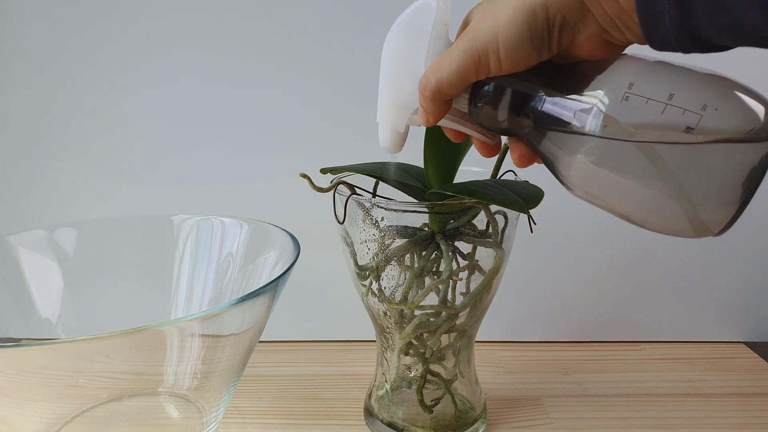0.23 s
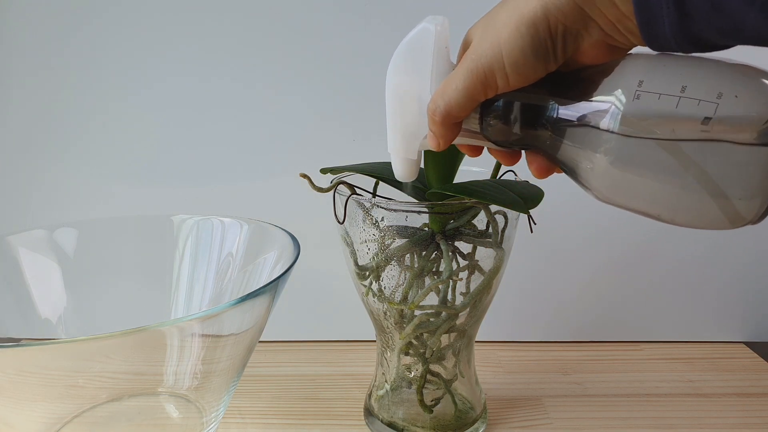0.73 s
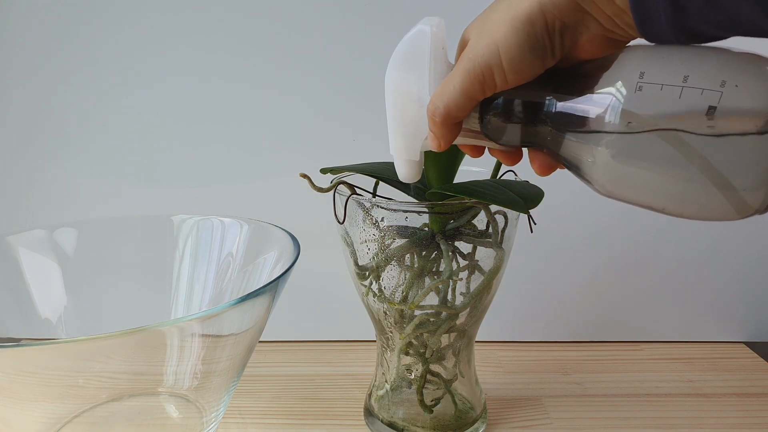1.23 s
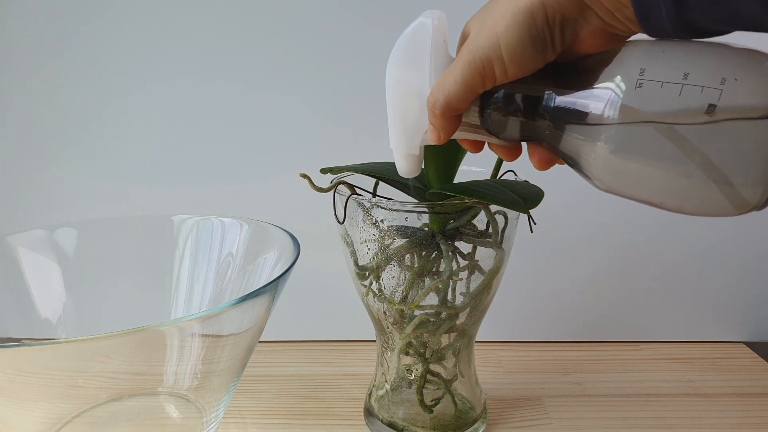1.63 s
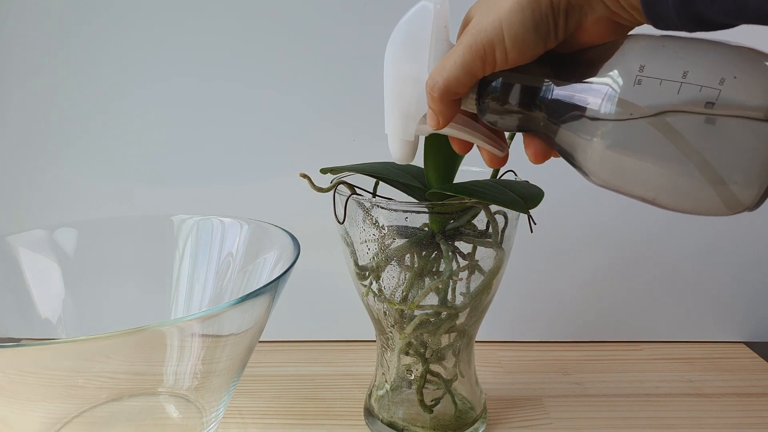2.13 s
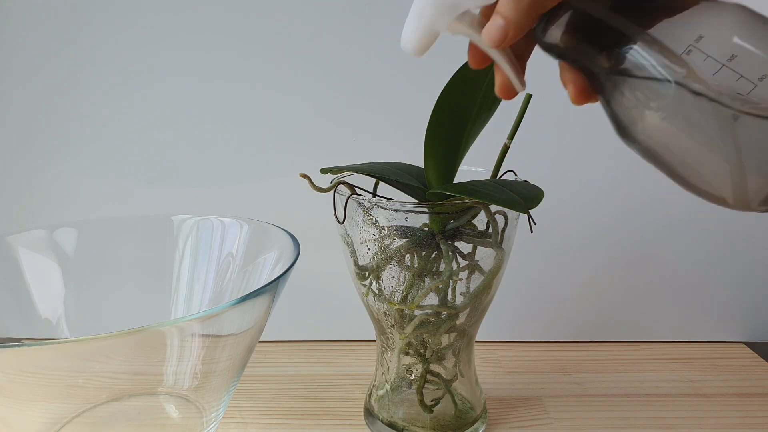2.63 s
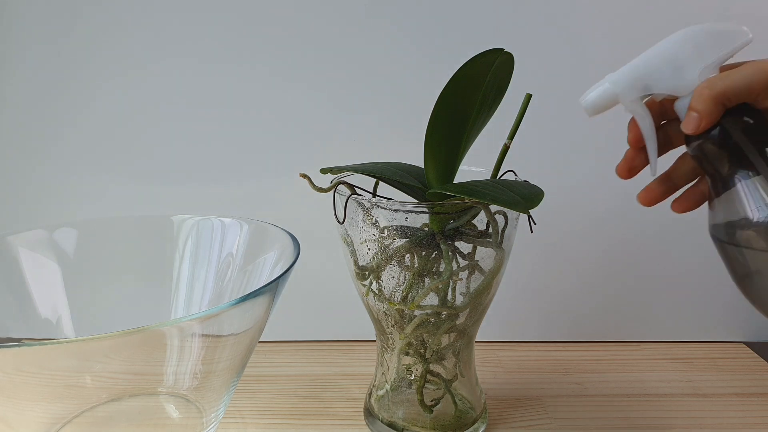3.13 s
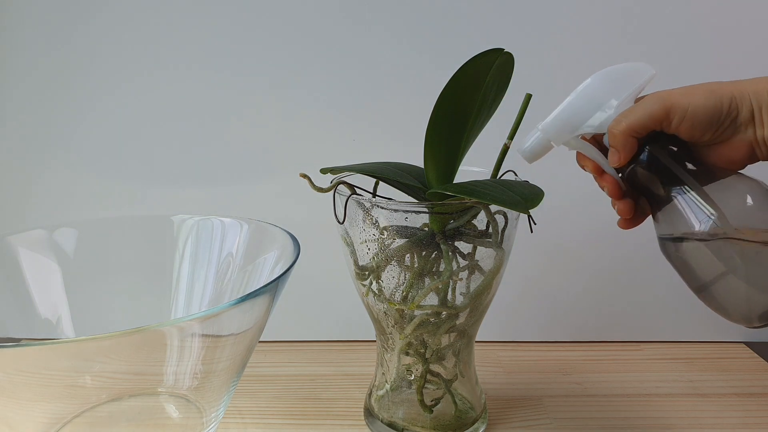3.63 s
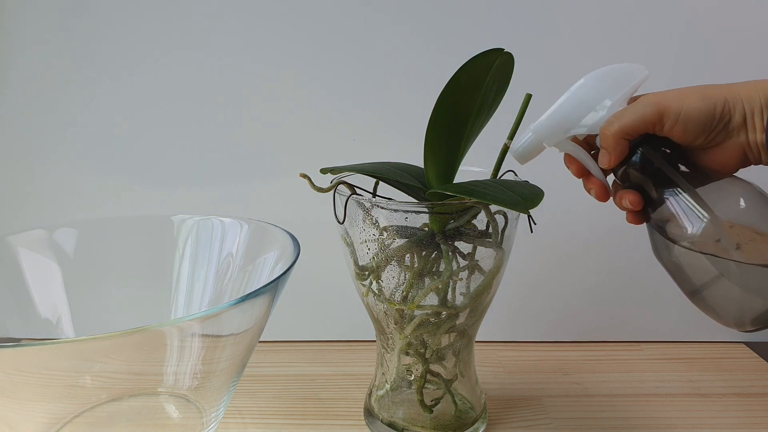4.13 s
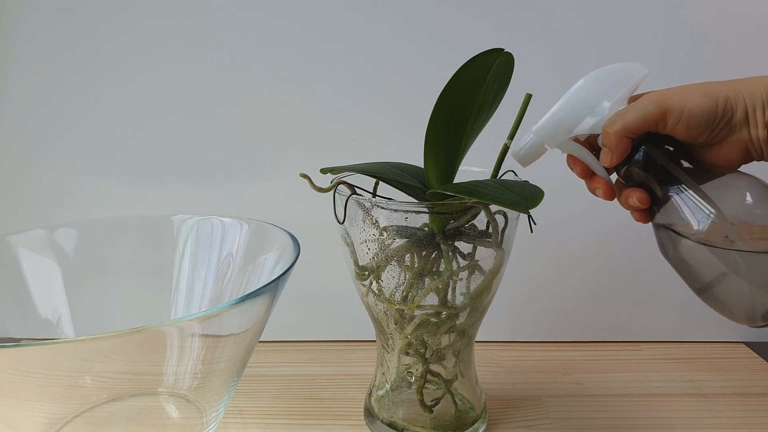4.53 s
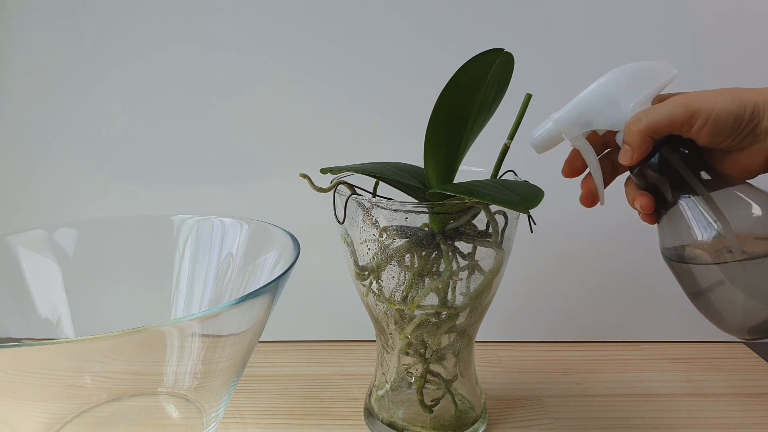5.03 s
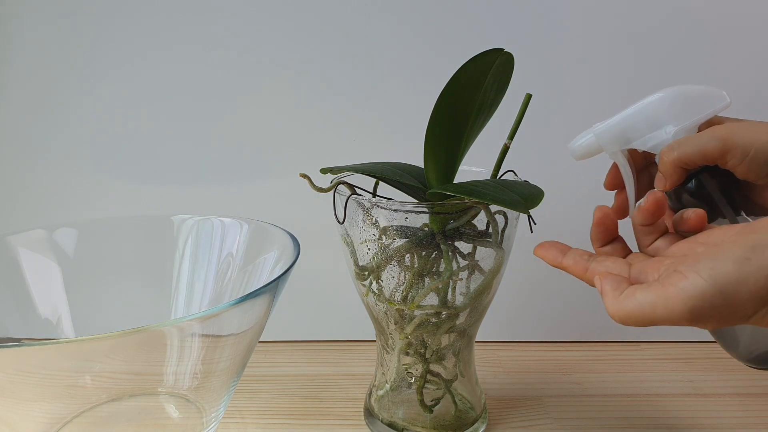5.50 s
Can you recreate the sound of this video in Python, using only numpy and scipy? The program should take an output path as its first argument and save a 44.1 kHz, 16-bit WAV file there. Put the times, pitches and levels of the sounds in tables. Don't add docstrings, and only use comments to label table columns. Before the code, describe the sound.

Five short squirts from a hand mister, heard close and the same in both channels. Two moderate sprays, the second after a tiny squeak, then a pause, a stronger third, another pause, the sharpest fourth and a quick weak fifth. Plastic clicks and rattles frame each one; a low hum dips after sprays and creeps back, and the hard room rings briefly.

```python
import sys
import numpy as np
from scipy import signal
from scipy.fft import rfft, irfft
from scipy.io import wavfile

SR = 44100
rng = np.random.default_rng(int(sys.argv[2]) if len(sys.argv) > 2 else 0)


def decibels_to_gain(level_db):
    exponent = np.asarray(level_db, float) / 20
    return 10 ** exponent


def dump(signal):
    limited = np.clip(np.atleast_2d(signal).T, -1, 1)
    pcm = np.round(limited * 32767).astype(np.int16)
    wavfile.write(sys.argv[1], SR, pcm)


N = 254100


def rms_one(x):
    return x / np.sqrt(np.mean(x ** 2) + 1e-20)


def at_hz(points, hz):
    table_hz, values = np.array(points)[:, 0], np.array(points)[:, 1]
    return np.interp(np.log(hz), np.log(table_hz), values)


def coloured(x, spectrum):
    hz = np.arange(N // 2 + 1) * SR / N + 1
    return rms_one(irfft(rfft(x) * decibels_to_gain(at_hz(spectrum, hz)), N))


def drift(rate_hz):
    r = np.exp(-2 * np.pi * rate_hz / SR)
    noise = rng.standard_normal(N + SR)
    return rms_one(signal.lfilter([1], [1, -2 * r, r * r], noise)[SR:])


def above(x, edge_hz):
    return signal.sosfilt(signal.butter(2, edge_hz, "high", fs=SR, output="sos"), x)


def struck(at, peak_db, modes):
    out = np.zeros(N)
    chance = rng.standard_normal((len(at), 2, len(modes)))
    for k, (hz, level_db, t60) in enumerate(modes):
        blows = np.full(N, 1e-18)
        blows[at] = decibels_to_gain(peak_db + level_db + 1.8 * chance[:, 0, k]) * np.sign(chance[:, 1, k])
        r = decibels_to_gain(-60 / (max(t60, 1e-4) * SR))
        w = 2 * np.pi * hz / SR
        out += signal.lfilter([0, np.sin(w)], [1, -2 * r * np.cos(w), r * r], blows)
    return out


# time in seconds, hum level in dB.
BACKGROUND_GAIN = [(0.0, -55.5), (0.32, -59), (0.56, -53), (0.77, -59), (1.39, -60.5), (1.72, -58),
                   (1.84, -59), (1.97, -57.5), (2.63, -58.5), (3.14, -52.5), (3.26, -58.5), (3.61, -59.5),
                   (4.109, -60), (4.65, -55), (4.85, -58), (5.25, -53), (5.76, -58.5)]
# frequency in Hz, level in dB per Hz.
RUMBLE_SPECTRUM = [(11, -36.5), (18, -10.5), (27, -3), (45, -1.5), (63, -5), (74, -16), (91, -11),
                   (150, -18), (218, -19), (320, -32.5), (420, -62.5), (700, -120)]
# frequency in Hz, level in dB per Hz.
AIR_SPECTRUM = [(180, -25), (300, -4), (424, -11.5), (731, -13.5), (1810, -20.5), (2000, -20),
                (2650, -21.5), (3230, -20.5), (6570, -32), (15500, -29)]


def background():
    phase = 2 * np.pi * np.cumsum(58.95 + 0.66 * drift(2.9)) / SR
    hum = np.sqrt(2) * np.sin(phase) * decibels_to_gain(0.41 * drift(4.1))
    rumble = decibels_to_gain(-6.5) * coloured(rng.standard_normal(N), RUMBLE_SPECTRUM)
    air = decibels_to_gain(-22.5) * coloured(rng.standard_normal(N), AIR_SPECTRUM)
    s, hum_db = np.transpose(BACKGROUND_GAIN)
    return decibels_to_gain(np.interp(np.arange(N) / SR, s, hum_db)) * (hum + rumble + air)


# frequency in Hz, time to fall by 60 dB in seconds.
ROOM_RINGING = [(700, 0.38), (2500, 0.27), (6000, 0.32), (10000, 0.27), (15000, 0.23)]


def room(x):
    near_echo_s, first_wall_s, build_up_s = 0.0012, 0.0029, 0.011
    near_share = 0.33
    t = np.arange(SR // 2) / SR
    edges = 300 * 2 ** np.arange(0, 6.1, .5)
    white = rng.standard_normal((2, len(t)))
    tail = 0
    for k, (low, high) in enumerate(zip(edges, edges[1:])):
        band = signal.sosfilt(signal.butter(2, [low, high], "band", fs=SR, output="sos"), white[k % 2])
        tail = tail + band * decibels_to_gain(-60 * t / at_hz(ROOM_RINGING, np.sqrt(low * high)))
    walls = 1 - np.exp(-np.maximum(t - first_wall_s, 0) / build_up_s)
    tail = tail * (near_share * (t > near_echo_s) + (1 - near_share) * walls)
    return signal.fftconvolve(x, tail / np.sqrt(np.sum(tail ** 2)))[:N]


# frequency in Hz, level in dB, time to fall by 60 dB in seconds.
BUBBLE_MODES = [(1760, 0, 0.045)]


def gulp():
    return struck([round(0.019 * SR)], -57.5, BUBBLE_MODES)


# time in seconds, pitch in Hz, level in dB.
SEAL_SQUEAK = [
    (1.242, 2100, -82),
    (1.255, 2137, -74.5),
    (1.299, 2303, -89.5),
    (1.325, 2420, -77.5),
    (1.366, 2514, -76),
    (1.385, 2480, -85),
]


def squeak():
    width_hz = 240
    t = np.arange(N) / SR
    s, hz, level_db = np.transpose(SEAL_SQUEAK)
    phase = 2 * np.pi * np.cumsum(np.interp(t, s, hz)) / SR
    band = drift(width_hz) * np.cos(phase) + drift(width_hz) * np.sin(phase)
    return band * decibels_to_gain(np.interp(t, s, level_db, left=-200, right=-200))


SLIP_SPREAD_DB = 3.5


def run_of(s, length, peak_db, colour_db, fade_db, count):
    step = np.linspace(0, 1, count)
    chance = rng.standard_normal((count, 5))
    inner = (step > 0) & (step < 1)
    jitter = 0.3 * np.tanh(chance[:, 0]) / (count - 1)
    when = s + length * (step + inner * jitter)
    swell_db = np.interp(step, [0, 0.35, 1], [-7, 0, -fade_db])
    level_db = peak_db + swell_db + SLIP_SPREAD_DB * chance[:, 1]
    return np.column_stack([when, level_db, np.array(colour_db) + SLIP_SPREAD_DB * chance[:, 2:]])


# frequency in Hz, level in dB, time to fall by 60 dB in seconds.
LEVER_MODES = [(4540, -0.5, .004), (5100, -2.5, .005), (5760, -1.5, .004), (6650, -2.5, .003)]
# frequency in Hz, level in dB, time to fall by 60 dB in seconds.
PORT_MODES = [(10000, 2, 0.0022), (10290, 2, 0.0043), (11500, -9, 0.00087), (13300, -6.5, 0.0022)]


def slips(events, head, tube):
    s, peak_db, tick_db, lever_db, knock_db = np.transpose(events)
    at = np.round(s * SR).astype(int)
    body = struck(at, peak_db - 9.5, head) + struck(at, peak_db + lever_db - 9.5, LEVER_MODES)
    body = signal.sosfilt(signal.butter(3, 1850, "high", fs=SR, output="sos"), body)
    tick = struck(at, peak_db + tick_db - 6.0, PORT_MODES)
    tick = signal.sosfilt(signal.butter(3, [8700, 13000], "band", fs=SR, output="sos"), tick)
    knock = above(struck(at, peak_db + knock_db - 11.5, tube), 560)
    return body + tick + knock


# frequency in Hz, level in dB, time to fall by 60 dB in seconds.
HEAD_PULLED = [(2100, -8, 0.023), (2376, -9.5, 0.0036), (2495, 2, 0.014), (2780, -1, 0.0073),
               (3120, 1.5, 0.008), (3480, -2.5, 0.011)]
# frequency in Hz, level in dB, time to fall by 60 dB in seconds.
TUBE_PULLED = [(650, -5.5, .015), (900, 0.5, .015), (1200, -6.5, .012), (1518, -1.5, .015)]
# start in seconds, length in seconds, peak in dB,
# then, in dB above that peak, the sharp tick and the closing tube knock.
PISTON_CREAKS = [
    (0.223, 0.019, -47, -4.5, -5.5),
    (1.2819, 0.061, -61.5, -2.5, -12),
    (1.387, 0.021, -44, 0.5, -3.5),
    (2.8623, 0.033, -46, -4, 6),
    (4.3572, 0.0295, -44.5, -7, -5.5),
    (4.982, 0.028, -46, -3, -13),
]
# time in seconds, peak in dB,
# then, in dB above that peak, the sharp tick and the lever.
TRIGGER_NUDGES = [(0.2215, -43.5, 1.5, -6), (0.2913, -54, -8, -10), (1.251, -69, -32, -23),
                  (1.258, -64, 12, 4), (1.3737, -63, -19, -24), (1.3823, -47, -2, -13),
                  (2.8706, -43.5, 0, -13), (4.3635, -44, -2, -11), (2.2215, -58.5, 11, 2),
                  (2.2453, -57, 4, -8), (4.0638, -55, 4, -2.5), (4.0805, -50, -7, -6),
                  (4.0911, -55.5, 4.5, -7), (4.3189, -64, -15, -17), (4.9728, -55, -5, -15),
                  (4.9776, -47.5, -4, -16), (4.9872, -40.5, -5, -17), (5.5318, -49, -5, -9)]


def pull():
    lever_db, knock_db = -13, -26.5
    rows = [[(s, db, tick, lever, -23)] for s, db, tick, lever in TRIGGER_NUDGES]
    for s, length, db, tick, last_knock in PISTON_CREAKS:
        rows.append(run_of(s, length, db, (tick, lever_db, knock_db), fade_db=3.5, count=6))
        rows.append([(s + length + 1 / SR, db - 5, tick, lever_db, last_knock + 6)])
    return slips(np.vstack(rows), HEAD_PULLED, TUBE_PULLED)


# frequency in Hz, level in dB, time to fall by 60 dB in seconds.
HEAD_LET_GO = [(2100, 1, 0.0045), (2646, 2.5, 0.0047), (2940, -1.5, 0.01), (3290, 3, 0.0045),
               (3620, -5.5, 0.0097)]
# frequency in Hz, level in dB, time to fall by 60 dB in seconds.
TUBE_LET_GO = [(846, -9.5, 0.0095), (1310, -3.5, 0.0048), (1500, 2.5, 0.012)]
# start in seconds, length in seconds, peak in dB,
# then, in dB above that peak, the sharp tick and the lever.
SPRING_RATTLES = [(0.0905, 0.046, -48.5, 2, -4), (0.777, 0.053, -47, -1.5, -5.5),
                  (0.8597, 0.065, -61.5, -10, -21), (1.855, 0.035, -52, -2, -9),
                  (3.296, 0.039, -49.5, 0, -3.5), (3.357, 0.054, -67.5, -4.5, -23),
                  (4.7754, 0.02, -50.5, -1.5, -4), (5.386, 0.02, -46.5, 1, -7.5),
                  (5.4176, 0.06, -55, -14, -12)]
# time in seconds, peak in dB,
# then, in dB above that peak, the sharp tick and the tube knock.
VALVE_CLACKS = [(0.1251, -40.5, -4.5, -2.5), (0.1766, -47, -7, -22), (0.7153, -48, -6, -2.5),
                (0.7472, -44, -8, -11), (0.7542, -47, 1, -13), (1.8231, -52.5, -8, -7),
                (1.8522, -44.5, -14, -10), (1.9093, -48.5, -15, -7), (3.235, -47.5, -11, -2),
                (3.288, -47.5, -3, -11), (5.3824, -45, 3.5, -4), (3.3772, -56, -15, 1.5),
                (4.7466, -54, 4, 5), (4.7539, -45, -2, -20), (1.954, -66, -13, -22),
                (4.8335, -50.5, -15, -4), (4.8539, -48, -8, -24)]


def release():
    rows = [[(s, db, tick, -8, knock)] for s, db, tick, knock in VALVE_CLACKS]
    for s, length, db, tick, lever in SPRING_RATTLES:
        rows.append(run_of(s, length, db, (tick, lever, -4.5), fade_db=7, count=7))
    return slips(np.vstack(rows), HEAD_LET_GO, TUBE_LET_GO)


def trigger():
    return pull() + release() + gulp() + squeak()


def droplets(per_s, spread_db):
    sizes = decibels_to_gain(spread_db * np.minimum(rng.exponential(1, N), 5)) * rng.choice([-1, 1], N)
    return rms_one(sizes * (rng.random(N) < per_s / SR))


def pressure_db(t, opens, full, gone):
    rising = -23.5 * np.clip((full - t) / (full - opens), 0, None) ** 2.28
    falling = -24 * np.clip((t - full) / gone, 0, None) ** 1.63
    return rising + falling


MIST_COARSE_DB = 1.5

# valve opens in seconds, full pressure in seconds,
# time until pressure is gone in seconds, mist patter in dB, nozzle jet in dB.
PUMP_SQUEEZES = [
    (0.337, 0.54, 0.16, -47, -42),
    (1.415, 1.619, 0.13, -46, -41.5),
    (2.907, 3.096, 0.11, -44.5, -39.5),
    (4.408, 4.582, 0.11, -44.5, -38),
    (5.045, 5.21, 0.13, -48, -45),
]


def squeeze_power(t):
    power = np.zeros((4, N))
    for opens, full, gone, mist_db, jet_db in PUMP_SQUEEZES:
        on = slice(int((opens - .1) * SR), int((full + 2 * gone) * SR))
        push_db = pressure_db(t[on], opens, full, gone)
        high = np.exp(push_db / 6.5)
        jet_now_db = jet_db + 1.2 * push_db
        mist_now_db = mist_db + push_db
        fine_db = MIST_COARSE_DB + (4.5 - MIST_COARSE_DB) * high
        levels_db = [jet_now_db, jet_now_db + high, mist_now_db, mist_now_db + fine_db]
        power[:, on] += decibels_to_gain(np.array(levels_db)) ** 2
    return power


# start
# in seconds, attack in seconds, # jet in dB, mist in dB, dying away in dB per second.
AIR_SPURTS = [(0.0, 0.00067, -50, -49.5, 348), (0.39, 0.03, -54.5, -59.5, 112),
              (1.405, 0.005, -64, -55.5, 252), (1.43, 0.014, -50, -72, 300), (1.7, 0.034, -57.5, -66, 126),
              (2.891, 0.0061, -56.5, -54, 301), (2.91, 0.013, -43, -48.5, 86.5),
              (3.048, 0.021, -29, -58, 169), (4.435, 0.0039, -36, -50, 302.5), (4.48, 0.01, -51, -50, 95.5),
              (4.562, 0.011, -33.5, -59.5, 205), (5.014, 0.0045, -68, -59, 400),
              (5.046, 0.018, -40, -55.5, 195.5)]


def spurt_power(t):
    power = np.zeros((4, N))
    for s, attack, jet_db, mist_db, dying_db in AIR_SPURTS:
        on = slice(int(max(s, 0) * SR), int((s + .5) * SR))
        age = t[on] - s
        shape = np.clip(age / attack, 0, 1) ** 1.7 * decibels_to_gain(-dying_db * np.maximum(age - attack, 0))
        levels_db = [[jet_db], [jet_db + 3.5], [mist_db], [mist_db + MIST_COARSE_DB]]
        power[:, on] += (decibels_to_gain(np.array(levels_db)) * shape) ** 2
    return power


# frequency in Hz, level in dB per Hz.
JET_SPECTRUM = [(3820, -48.5), (6500, -23), (8010, -24.5), (9600, -3.5), (10600, -0.5), (13800, -13),
                (14900, -10.5), (15400, -16)]
# frequency in Hz, level in dB per Hz.
MIST_SPECTRUM = [(150, -49.5), (250, -18.5), (588, -14), (690, -6), (991, -7.5), (1720, -1.5), (2270, -2.5),
                 (3400, -1), (6340, -14), (8000, -24.5), (10400, -43), (17600, -120)]


def sprays():
    flutter = decibels_to_gain(1.0 * drift(150) + 1.07 * drift(20))
    jet = coloured(flutter * (rng.standard_normal(N) + .5 * droplets(2500, 2.8)), JET_SPECTRUM)
    cloud = decibels_to_gain(0.99 * drift(40)) * rng.standard_normal(N)
    mist = coloured(cloud + .5 * droplets(1500, 4.0), MIST_SPECTRUM)
    layers = np.array([jet - above(jet, 13240), above(jet, 12500), mist - above(mist, 2800), above(mist, 2685)])
    t = np.arange(N) / SR
    power = squeeze_power(t) + spurt_power(t)
    return np.sum(np.sqrt(power) * layers, axis=0)


def scene():
    clicks = trigger()
    spray = decibels_to_gain(-2.5) * sprays()
    echoes = room(decibels_to_gain(6) * clicks + decibels_to_gain(-4.5) * spray)
    heard = spray + clicks + echoes + background()
    return np.array([heard, heard])


def low_pass(x):
    return signal.sosfilt(signal.butter(12, 16160, fs=SR, output="sos"), x)


def record(dry):
    notched = signal.lfilter(*signal.iirnotch(8000, 8.2, fs=SR), dry)
    dipped = notched + decibels_to_gain(-2.5) * (dry - notched)
    hz = np.arange(N // 2 + 1) * SR / N
    wall = np.clip((15590 - hz) / 120, 0, 1)
    finished = irfft(rfft(dipped) * wall, N)
    return low_pass(finished)


dry = scene()
out = record(dry)
dump(out)
```